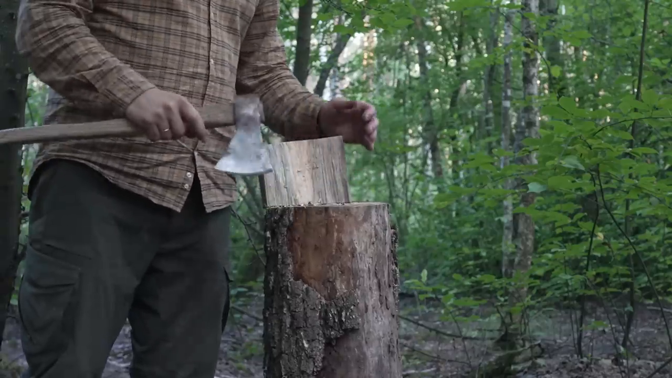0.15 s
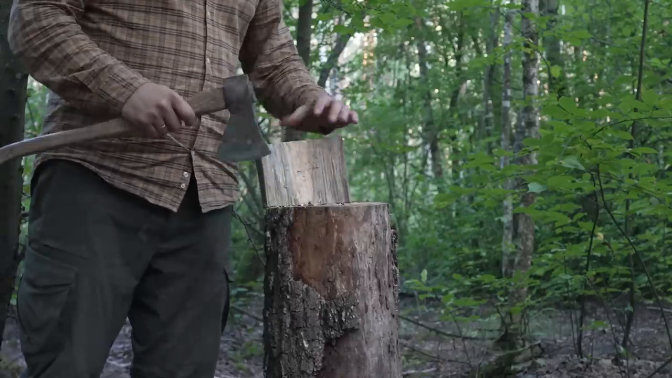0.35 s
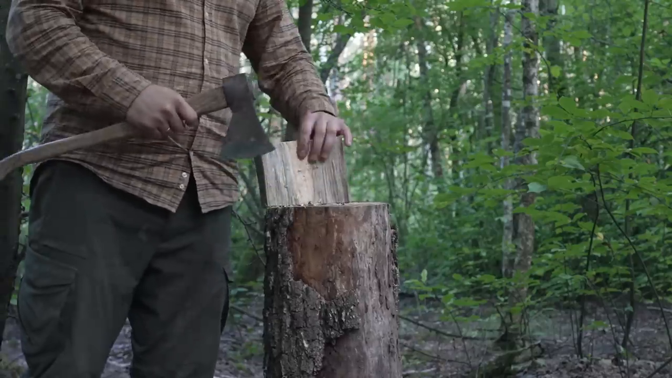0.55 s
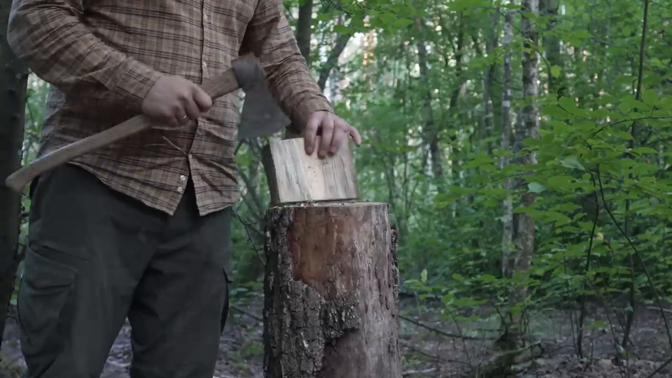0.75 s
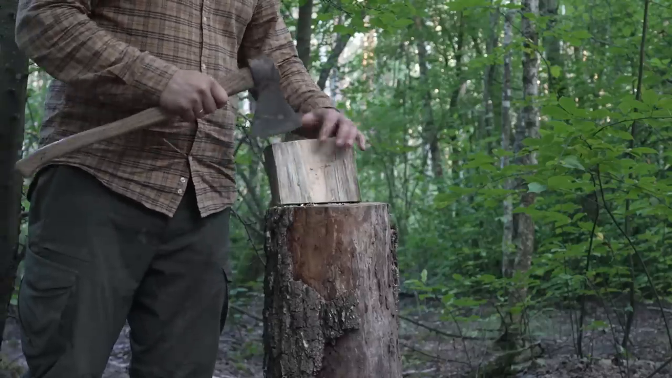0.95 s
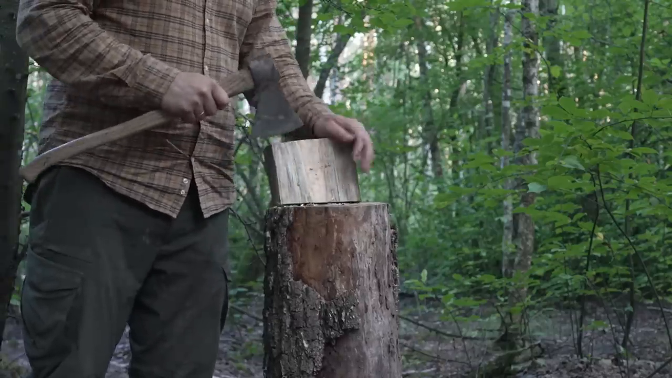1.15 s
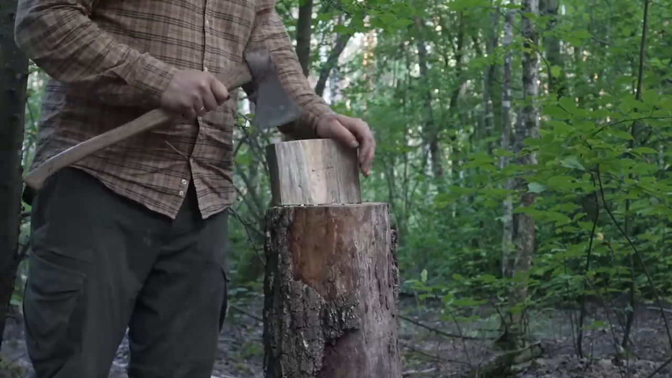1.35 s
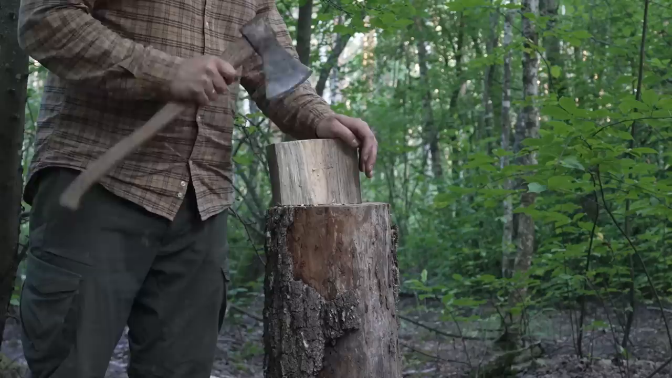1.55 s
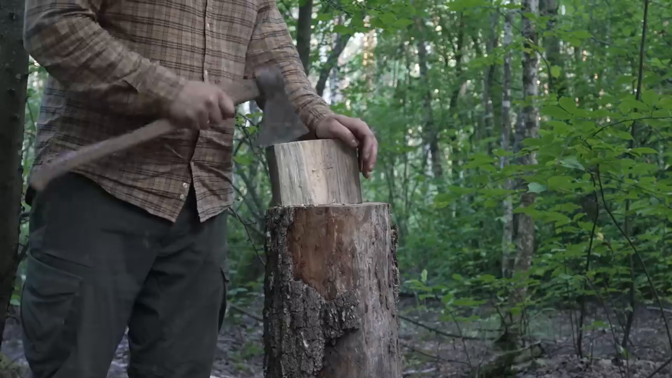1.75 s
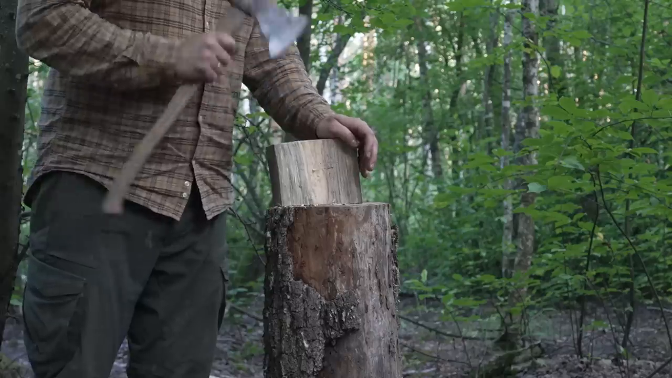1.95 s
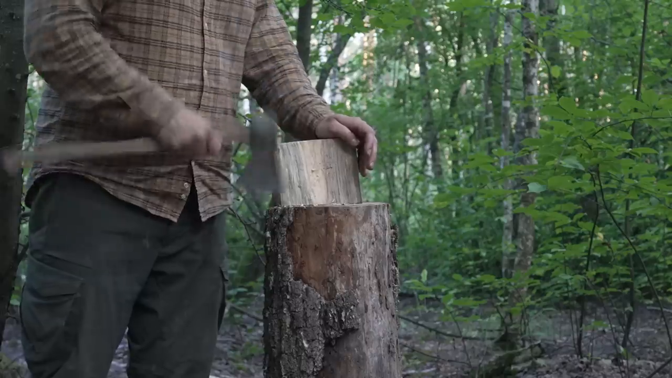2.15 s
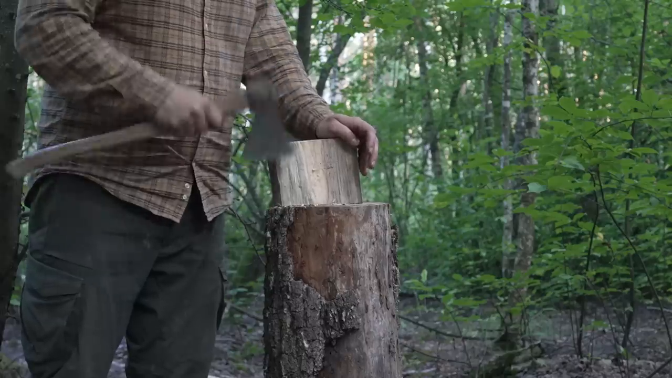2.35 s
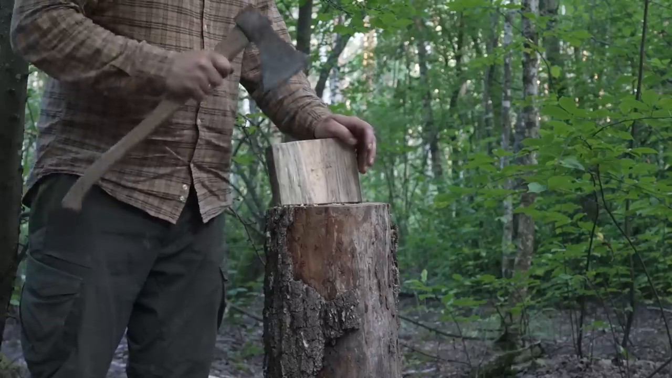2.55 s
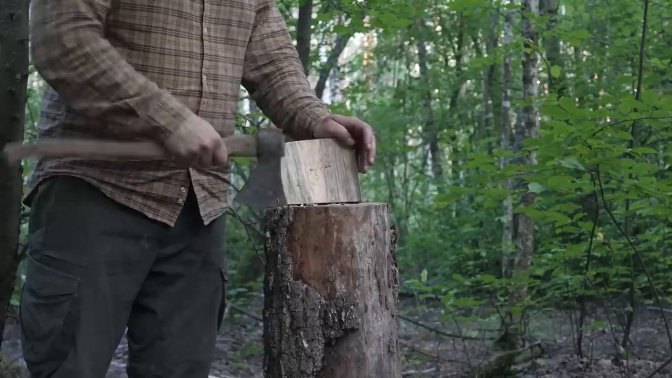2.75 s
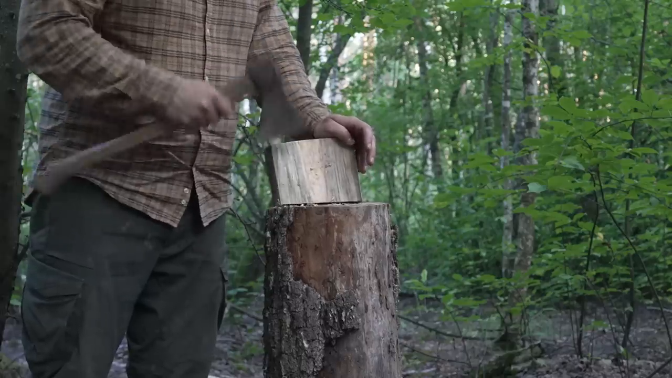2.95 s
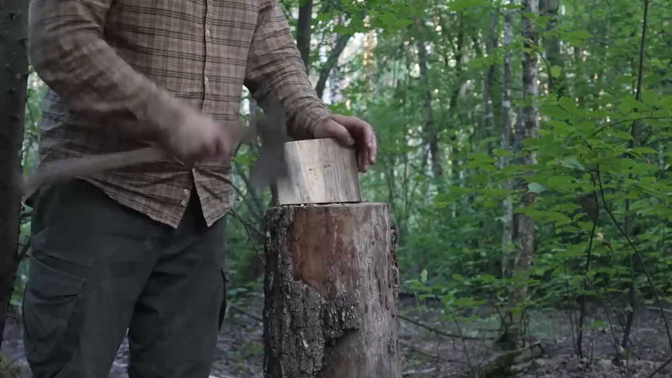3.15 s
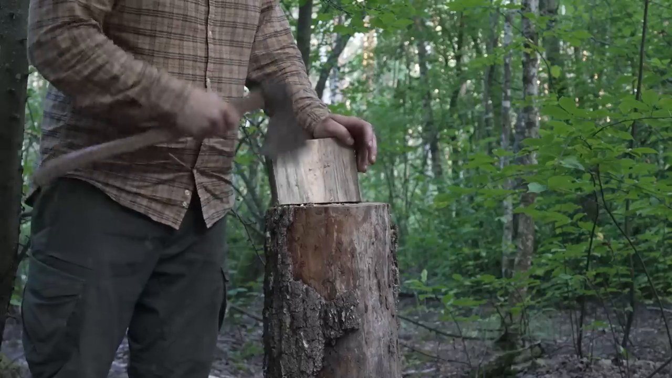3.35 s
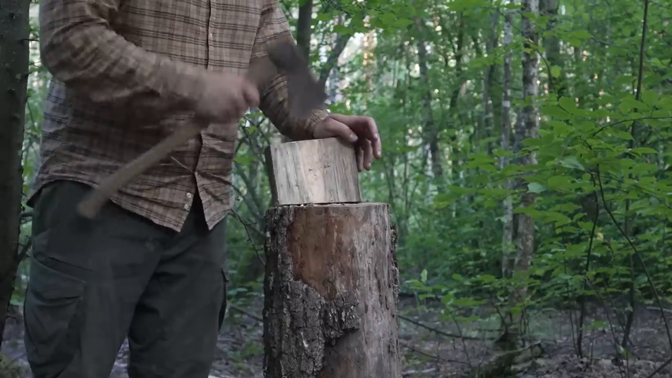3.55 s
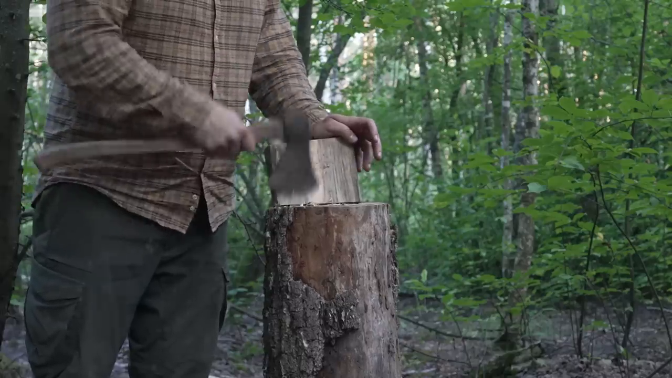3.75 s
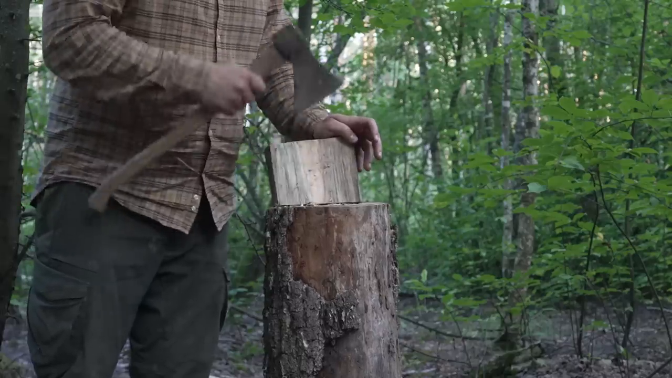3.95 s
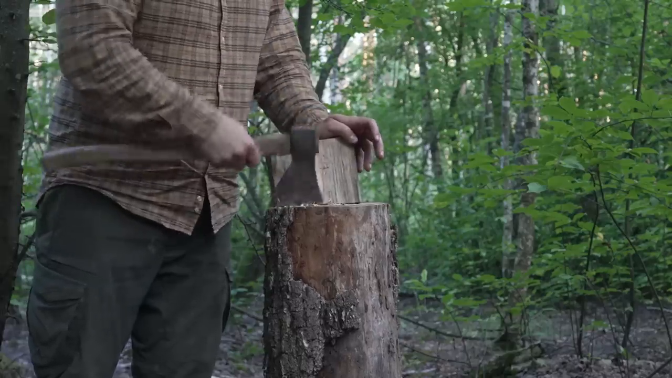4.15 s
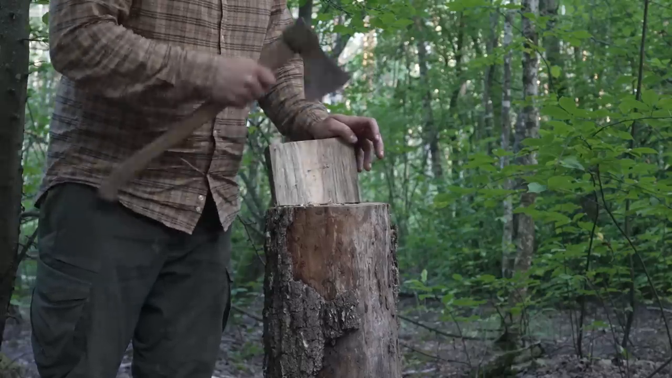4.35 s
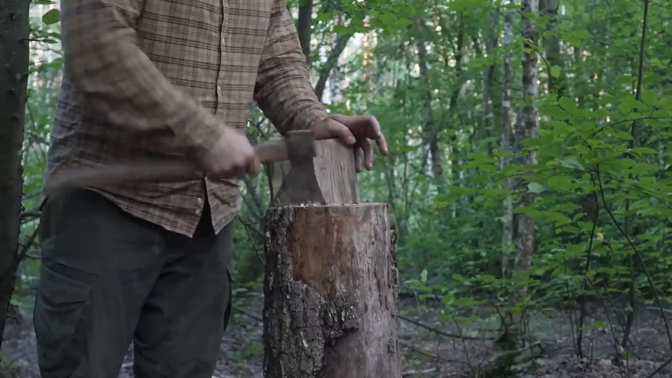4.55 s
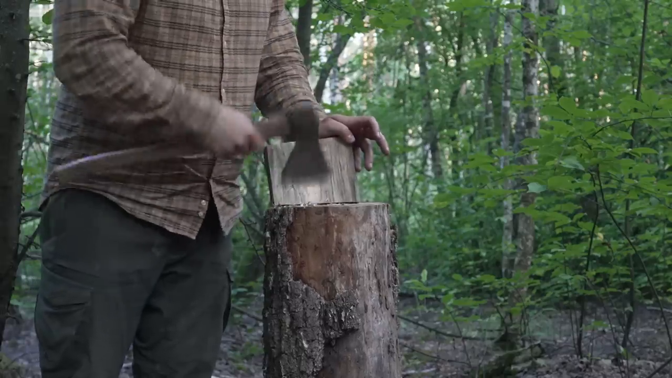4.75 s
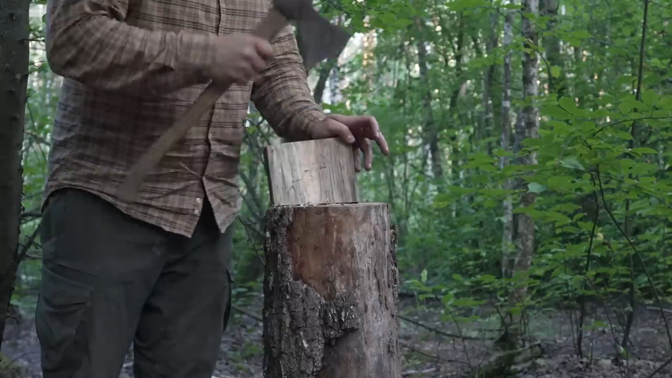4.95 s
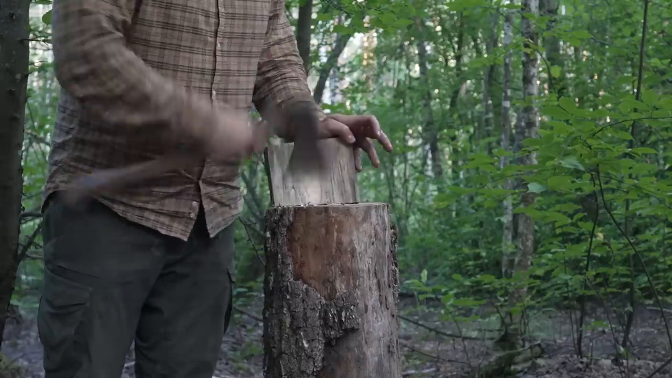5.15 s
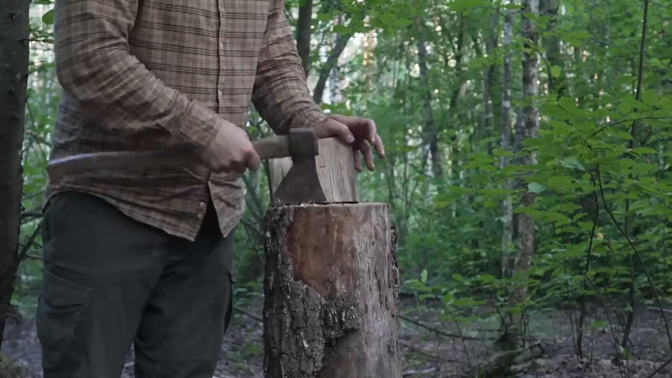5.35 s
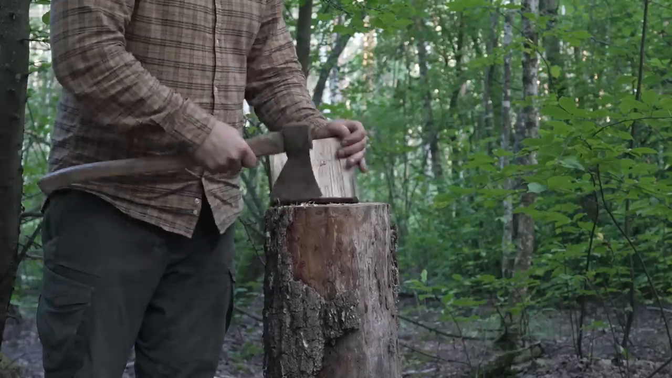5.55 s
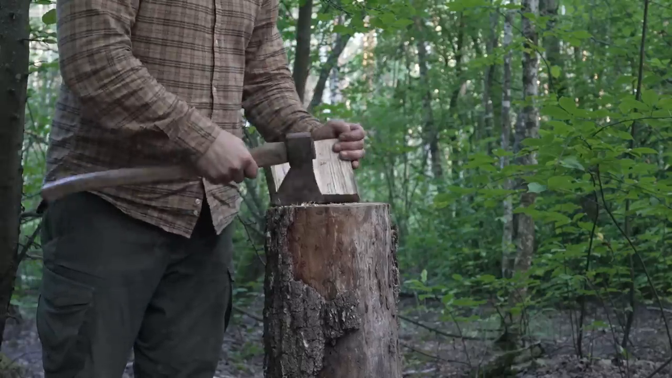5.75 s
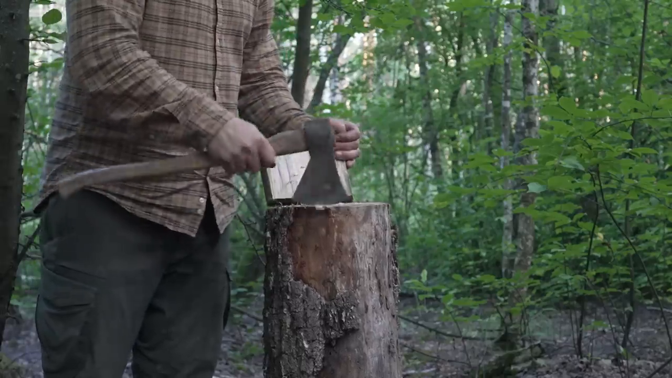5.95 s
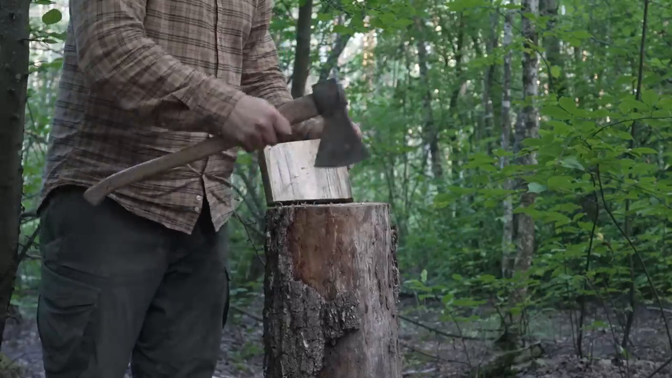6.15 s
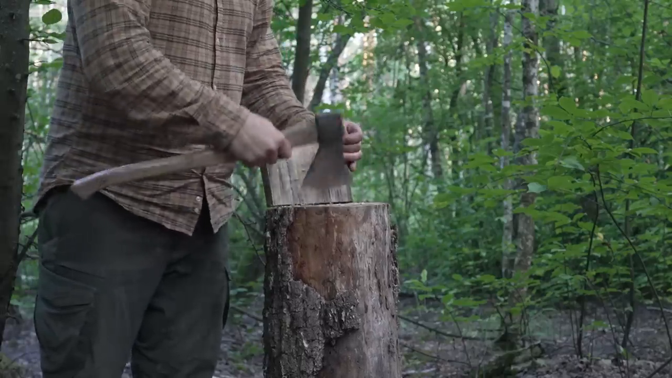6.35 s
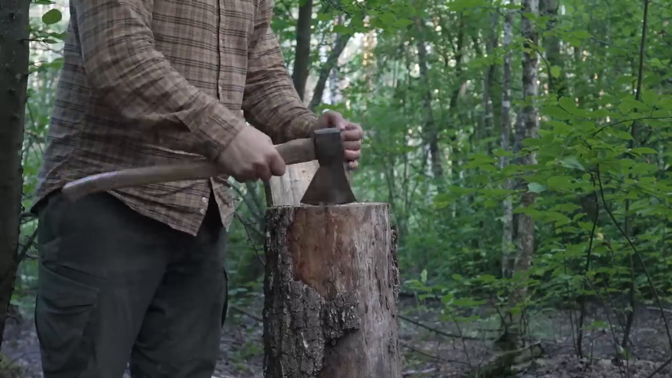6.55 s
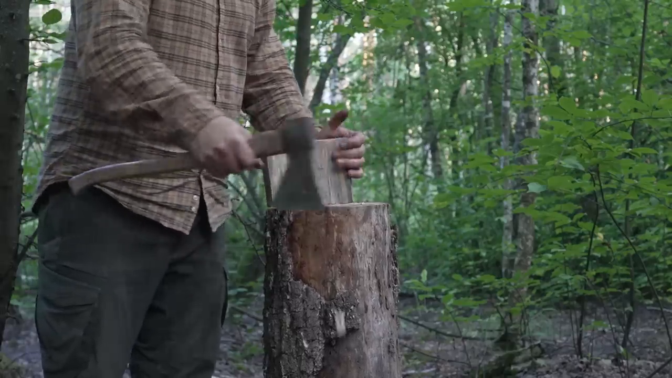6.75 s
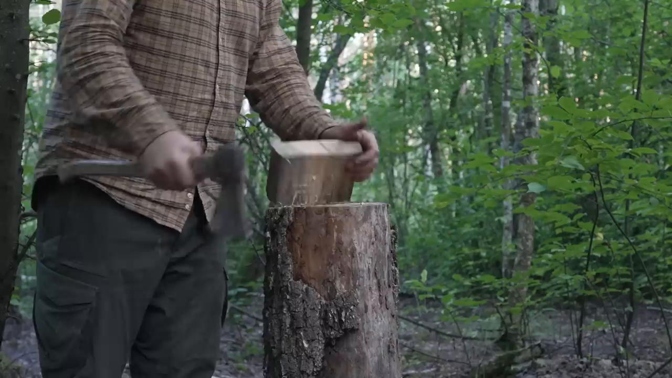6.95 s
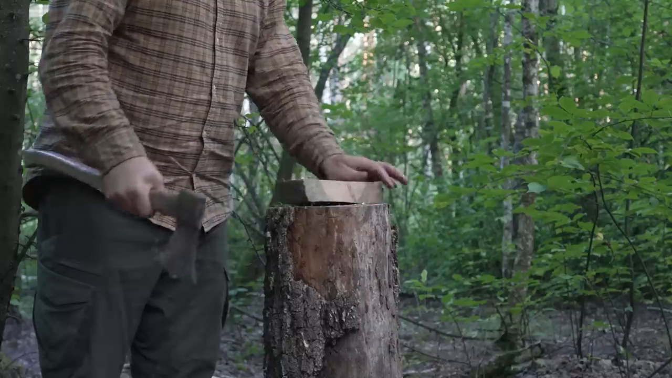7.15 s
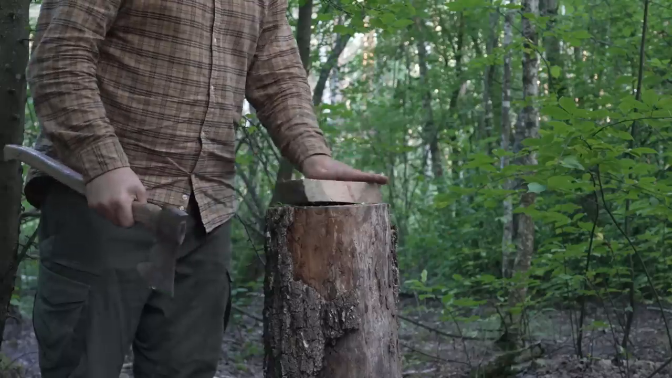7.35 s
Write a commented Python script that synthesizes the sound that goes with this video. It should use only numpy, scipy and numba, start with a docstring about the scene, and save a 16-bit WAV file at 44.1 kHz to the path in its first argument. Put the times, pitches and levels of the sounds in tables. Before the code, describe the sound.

Sharp hatchet blows split wood on a stump, then softer knocks and rustles follow over faint woodland hiss.

```python
"""Hatchet splitting wood

A hatchet takes thin pieces off a block on a stump in a wood. A chop is two impacts, the edge biting
and then meeting the stump, each exciting the modes of the wood; between them sliding friction tears
the fibres and sets the steel head ringing. Chips fall into dry leaves, trunks scatter a soft echo
and the ground thuds, over a faint murmur and hiss. The hardest blows overload."""
import sys
import numpy as np
from scipy import signal
from scipy.fft import rfft, irfft
from scipy.io import wavfile
from scipy.ndimage import uniform_filter1d
from numba import njit

SR = 44100
rng = np.random.default_rng(int(sys.argv[2]) if len(sys.argv) > 2 else 0)


def wav_out(sig):
    """Save sig, one row per channel (or a flat mono array), as 16-bit PCM at SR to the path in sys.argv[1]."""
    wavfile.write(sys.argv[1], SR, np.round(np.clip(np.atleast_2d(sig).T, -1, 1) * 32767).astype(np.int16))


N = 326340

# background noise: f/Hz, relative spectral level/dB
AIR_SPECTRUM = [(15, -31), (25, -1), (129, -8.5), (156, -1.5), (233, -14), (389, -11), (457, -12.5),
                (509, -12), (2120, -22.5), (2420, -24), (6050, -27.5), (6920, -27.5), (15500, -29)]
# the blade sliding on wood: start/s, end/s, tearing/dB, wood rubbed/dB, steel struck/dB,
# steel rubbed/dB, steel overtones/dB, muting of the steel at the end/dB (negative: a boost)
BLADE_SLIDES = [(0.0, 0.009, -53, -47, -43.5, -97, -16, -6), (1.745, 1.753, -41.5, -42, -70, -99, -3, 20),
                (2.207, 2.218, -37, -25.5, -40.5, -65, -6.5, -3.5),
                (2.2276, 2.272, -38, -35.5, -23.5, -63.5, -8.5, 32.5),
                (2.81, 2.848, -47, -29.5, -42, -49, -2.5, 28),
                (3.241, 3.276, -47.5, -31.5, -28.5, -68, -2.5, 31.5),
                (3.705, 3.733, -43, -27, -29, -57, -2.5, 28.5), (3.799, 3.835, -58, -64, -63, -87, 3, 4),
                (4.138, 4.167, -46.5, -24, -23.5, -61.5, -6, 25.5),
                (4.626, 4.65, -45, -15.5, -32, -58, -5.5, 31.5),
                (4.783, 4.815, -60, -72, -64, -90.5, 10, 7),
                (5.258, 5.274, -55, -17.5, -31.5, -42.5, -10, 33.5),
                (5.888, 5.943, -57.5, -56.5, -66, -82.5, 8.5, 6), (5.944, 6.019, -50, -53, -45, -70, 3, 2),
                (6.539, 6.573, -54.5, -49.5, -53, -72, -1, -9),
                (6.577, 6.626, -53, -49.5, -45, -59, 2.5, 6), (6.633, 6.661, -52, -48.5, -38, -64.5, 0, 9),
                (6.660, 6.689, -51, -46.5, -51, -63, 0, 6.5)]
# modes of the hatchet head: f/Hz, level/dB, free T60/s, share of the muting felt
STEEL_MODES = [(2589, -1.5, 0.062, .95), (2610, -4.5, 0.058, 1.1), (4350, -13, 0.5, 1.1),
               (4399, -1.5, 0.76, 0.68), (6220, -13.5, 0.078, 0.99), (6900, -15.5, 0.13, .9),
               (7800, -17, .15, .8), (10970, -18, 0.02, 0.796), (11630, -12.5, 0.12, .6),
               (12650, -17.5, .06, .8)]
# modes of block and stump: f/Hz, level/dB, T60/s
WOOD_MODES = [(142, 3.5, 0.1), (180.6, 4, 0.12), (269, -3.5, 0.026), (344, 3, 0.041), (428.5, 5, 0.037),
              (538.6, 5, 0.048), (618, 3.5, 0.032), (749, 5.5, 0.055), (775, 0.76, .03), (1135, 6.5, 0.029),
              (1503, 5, 0.02), (1663, 1.7, 0.024), (1907, 3, 0.019), (2380, -0.5, 0.0061),
              (3040, -6, 0.021)]
# leaves, bark and cloth: peak t/s, fall time/s, level/dB, centre f/Hz, bandwidth over centre
RUSTLE_SWELLS = [(0.03, 0.25, -60.5, 7923, 1.7), (0.275, 0.039, -54, 6500, 1.9),
                 (0.299, 0.03, -54, 1970, .35), (0.328, 0.011, -51, 5160, 2.1),
                 (0.389, 0.029, -50, 8000, 1.5), (0.464, 0.12, -59.5, 5705, 3.3),
                 (0.809, 0.064, -60, 4000, 1.9), (0.81, .04, -66, 2000, .45),
                 (3.112, 0.071, -50.5, 1870, 1.34), (3.115, 0.043, -56.5, 9000, 1.1),
                 (3.479, 0.077, -52, 4836, 1.2), (5.776, 0.074, -62, 1505, 1.1),
                 (5.779, 0.064, -64, 5220, 0.54), (6.76, 0.11, -63.5, 1390, 2.1),
                 (7.089, .07, -61.5, 1840, .3), (7.11, 0.1, -60.5, 3200, 0.89),
                 (7.157, 0.018, -44.5, 2470, 1.7), (7.2, 0.28, -61.5, 3500, 2.3),
                 (7.33, .09, -64, 1940, 0.41)]
# reverberation among the trees: f/Hz, level/dB, T60/s
ECHO_BANDS = [(153, -26, 0.38), (310, -29, 0.36), (574, -44, 1.7), (860, -40.5, 1.39),
              (1312.4, -31.5, 0.74), (2100, -31.5, 0.84), (3300, -26.5, 0.48), (5594, -26, 0.41),
              (9000, -28, 0.45), (13020, -34.5, 0.37)]
# breaking fibres, chips and twigs: t/s, body level/dB, treble level/dB
FIBRE_SNAPS = [(0.057, -47, -43.5), (0.096, -46, -45), (0.167, -50.5, -55), (0.263, -42, -33),
               (0.272, -40, -34), (0.289, -28, -27.5), (0.385, -34, -37.5), (0.4616, -44, -47),
               (0.527, -58, -47), (0.698, -57, -52), (0.785, -41.5, -39), (0.829, -34, -46),
               (0.895, -49, -52), (2.2085, -25, -12), (2.2222, -24.5, -16.5), (2.227, -24.5, -17),
               (2.253, -35.5, -23.5), (2.262, -14.5, -20), (2.7232, -42.5, -50), (3.460, -37.5, -44),
               (5.4563, -46.5, -59), (6.531, -42, -50), (7.151, -32, -43), (7.188, -38, -62),
               (7.220, -56.5, -46.5)]
# impacts on wood: t/s, level/dB, favoured f/Hz, low modes/dB, high modes/dB, T60 factor, crack/dB
WOOD_KNOCKS = [(0.318, -23, 256, -14.5, -13, 0.6, -23.5), (0.604, -44.5, 264, -8, -9, 0.51, -53),
               (0.673, -39.5, 374, -10, -5, 0.55, -44), (0.872, -17, 433, -33, -18.5, 0.52, -52.5),
               (1.747, -2.5, 549, -19.5, -8, 0.94, -25), (2.210, -5, 441, -25.5, -8, 0.8, -24),
               (2.251, -14, 337, -9.5, -1.5, 0.36, -21), (2.266, -9, 716, -11, 4, 0.83, -10),
               (2.700, -34, 347, -12.5, -8.5, 0.45, -39), (2.813, -7.5, 538, -31, -12.5, 0.93, -25),
               (2.844, -7.5, 439, -9.5, -1.5, 0.78, -13.5), (3.240, -4.5, 589, -19, -25, 0.58, -25.5),
               (3.267, -1, 342, -14.5, -14, 0.99, -20), (3.705, -1, 452, -28.5, -30, 0.65, -21),
               (3.733, -9, 331, -16.5, -13.5, 0.82, -30), (4.138, 2.5, 447, -30, -16, 0.49, -21.5),
               (4.163, -2, 331, -27.5, -15.5, 1, -25.5), (4.6216, 6, 697, -29.5, -17.5, 0.32, -21),
               (4.643, -3.5, 611, -14, -12.5, 0.95, -29.5), (5.256, 5.5, 807, -29, -23.5, 0.52, -16.5),
               (5.275, -4.5, 331, -25.5, -8.5, 1, -25.5), (5.704, -24, 336, -41, -24, 0.6401, -45),
               (5.956, -36, 336, -17, -6, 0.87, -54), (6.508, -28, 353, -19.5, -17, 0.88, -50),
               (6.683, -31.5, 380, -9, -2.5, 0.84, -30), (7.013, -47.5, 336, -7.5, -1, 0.83, -52),
               (7.175, -20, 522, -27, -9, 0.7, -36), (7.207, -24, 323, -16, -7.5, 0.66, -46),
               (7.244, -34.5, 334, -22, -27.5, 0.55, -60)]

CATCH_DB, CATCH_S, CHATTER_DB, CHATTER_S = 4, 0.004, 2.5, 0.013  # quick grit, slower chatter of the edge
GRIPPED_T60_S, BEDDED_S = 0.23, 0.05  # after a chop the edge stays in the stump for a moment
WEDGED_SHARP, WEDGED_WOBBLE = 0.012, 0.012  # squeezing raises and shakes the head's pitch by these shares
EARLY_DB, EARLY_T60_S, BLUR_HZ = 15, 0.12, 25
STEEL_ECHO_DB = -1  # the head radiates sideways, so the trees get their own share of it
SNAP_T60_S, SNAP_RISE_S, CRACK_T60_S, CRACK_RISE_S = 0.024, 0.0015, 0.014, 0.00021
TICKS_PER_S, TICK_DB = 2, -59  # stray ticks in the leaf litter
CONTACT_S, CONTACT_CYCLES, SOFTER_PER_DB = 0.00086, 0.36, 0.0626  # weaker blows stay in contact longer
THUD_HZ, THUD_DB, THUD_T60_S = 40.8, -47, 0.8
AIR_DB, FULL_SCALE, TOP_HZ = -62.5, 0.82, 16000


def undb(db):
    """Amplitude ratio of a level in decibels."""
    return 10 ** (np.asarray(db) / 20)


def fade(t, t60):
    """Exponential decay of 60 dB in t60 seconds."""
    return undb(-60 * t / t60)


def unit(x):
    """Normalisation to an rms of 1."""
    return x / np.sqrt(np.mean(x ** 2))


def at_peak(x, db):
    """Normalisation to a peak level of db."""
    return undb(db) * x / np.abs(x).max()


def band(x, hz, width_hz):
    """Butterworth band-pass with geometric centre hz."""
    top = width_hz / 2 + np.sqrt(hz ** 2 + width_hz ** 2 / 4)
    edges = [hz ** 2 / top, min(top, 0.48 * SR)]
    return signal.sosfilt(signal.butter(2, edges, "bandpass", fs=SR, output="sos"), x)


def add(out, s, sound):
    """Superposition of a sound starting at s seconds."""
    i = max(int(s * SR), 0)
    out[i:i + len(sound)] += sound[:N - i]


def grains(size, spread_db):
    """Heavy-tailed noise: rare large samples are heard as crackle."""
    return unit(rng.standard_normal(size) * undb(spread_db * rng.exponential(size=size)))


def smooth(x, span_s):
    """A moving average, which keeps the slow fluctuations."""
    return uniform_filter1d(x, int(span_s * SR))


@njit
def ring(force, turn, keep):
    """A driven, damped resonator whose frequency and loss may vary every sample."""
    y, z = np.empty(len(force)), 0j
    for i in range(len(force)):
        z = z * turn[i] * keep[i] + force[i]
        y[i] = z.imag
    return y


def air():
    """Spectrally shaped noise: distant woodland murmur and microphone hiss, the lows wandering in level."""
    hz = np.maximum(np.arange(N // 2 + 1) * SR / N, 1)
    knot_hz, knot_db = np.array(AIR_SPECTRUM).T
    spectrum = undb(np.interp(np.log(hz), np.log(knot_hz), knot_db))
    noise = irfft(rfft(rng.standard_normal(N)) * spectrum, N)
    wander = undb(3.4 * unit(smooth(smooth(rng.standard_normal(N), 0.1), 0.1)))
    return undb(AIR_DB) * unit(noise + (wander - 1) * band(noise, 130, 400))


def steel_ring(drive, grip, mute, bend):
    """Forced vibration of the head's modes, damped by the wood while it grips them."""
    out = 0
    for hz, db, t60, share in STEEL_MODES:
        damped_t60 = np.where(grip > 0, min(t60, GRIPPED_T60_S), t60)
        keep = fade(1 / SR, damped_t60) * undb(-share * mute)
        turn = np.exp(2j * np.pi * hz * bend / SR)
        group = int(hz > 3500) + int(hz > 5500)
        out = out + undb(db) * ring(drive[group] + 1e-18, turn, keep)
    return out


def slides():
    """Stick-slip friction hisses and drives wood and steel; returns the tearing and the steel's ring."""
    tear, shake, grip, mute, wedged = np.zeros((5, N))
    catch, chatter = (unit(smooth(rng.standard_normal(N), s)) for s in (CATCH_S, CHATTER_S))
    roughness = unit(undb(CATCH_DB * catch + CHATTER_DB * chatter))
    drive = np.zeros((3, N))  # force on the low pair of modes, the main pair and the overtones
    mute_samples = int(0.008 * SR)
    for start, end, tear_db, wood_db, struck_db, rubbed_db, high_db, mute_db in BLADE_SLIDES:
        span = end - start
        t = np.arange(int((span + 0.024) * SR)) / SR
        onset = np.minimum(1, t / (0.2 * span))
        release = fade(np.maximum(t - span, 0), t60=0.02)
        shape = onset * undb(-3.5 * t / span) * release  # the rubbing eases along the slide
        force = undb(rubbed_db) * shape * grains(len(t), 0.9) * roughness[int(start * SR):][:len(t)]
        force[0] = undb(struck_db)
        for group, group_db in zip(drive, (0.71 * high_db + 1.5, 0, high_db)):
            add(group, start, undb(group_db) * force)
        add(tear, start, undb(tear_db) * shape)
        add(shake, start, undb(wood_db) * shape)
        is_chop = mute_db > 15
        add(grip, start, np.ones(int((span + BEDDED_S * is_chop) * SR)))
        add(wedged, start, np.full(int(span * SR), float(is_chop)))
        add(mute, end - 0.001, np.full(mute_samples, mute_db / mute_samples))
    bend = 1 + wedged * (WEDGED_SHARP + WEDGED_WOBBLE * catch)
    hiss = unit(band(grains(N, 1.8), 6500, 13000)) * roughness
    rub = grains(N, 3) * np.sqrt(roughness)
    wood = unit(sum(undb(db - 5 * np.log2(hz / 550) ** 2) * band(rub, hz, 4 / t60)
                    for hz, db, t60 in WOOD_MODES))
    return tear * hiss + shake * wood, steel_ring(drive, grip, mute, bend)


def rustles():
    """Many tiny contacts in leaves, bark and cloth sum to swells of band-limited crackle."""
    out = np.zeros(N)
    for peak, fall, db, hz, width in RUSTLE_SWELLS:
        rise = fall / 2
        t = np.arange(-min(rise, peak), 3 * fall, 1 / SR)
        rising = np.cos(t / rise * np.pi / 2) ** 2
        falling = np.exp(-1.5 * (np.abs(t) / fall) ** 0.79)
        crackle = unit(band(grains(len(t), 1.8), hz, width * hz))
        add(out, peak + t[0], undb(db) * np.where(t < 0, rising, falling) * crackle)
    return out


def tree_echo(x):
    """Diffuse scattering: a strong, brief return from nearby trunks and undergrowth, a long one from afar."""
    t = np.arange(int(1.2 * SR)) / SR
    early = undb(EARLY_DB) * fade(t, EARLY_T60_S)
    shape = undb(-26.5) * (1 - np.exp(-t / 0.0025)) * (1 + early)
    # moving leaves and air shift the sound between two sets of paths, which blurs pure tones
    drift = np.cumsum(rng.standard_normal(N)) * np.sqrt(2 * np.pi * BLUR_HZ / SR)
    out = 0
    for weight in (np.cos(drift), np.sin(drift)):
        tail = sum(undb(db) * fade(t, t60) * band(rng.standard_normal(len(t)), hz, 0.46 * hz)
                   for hz, db, t60 in ECHO_BANDS)
        out = out + weight * signal.fftconvolve(x, tail * shape)[:N]
    return out


def snaps():
    """Brittle fracture radiates brief noise bursts: snaps, the crack of each knock, and stray ticks."""
    out, t = np.zeros(N), np.arange(int(0.06 * SR)) / SR
    cracks = [(s, db, db - 7) for s, *_, db in WOOD_KNOCKS]
    stray = rng.random((int(TICKS_PER_S * N / SR), 3))
    ticks = [(when * N / SR, TICK_DB - 6 * body, TICK_DB - 6 * treble) for when, body, treble in stray]
    kinds = (FIBRE_SNAPS, SNAP_T60_S, SNAP_RISE_S), (cracks + ticks, CRACK_T60_S, CRACK_RISE_S)
    for events, t60, rise in kinds:
        for s, body_db, treble_db in events:
            burst = grains(len(t), 2.8) * fade(t, t60) * (1 - np.exp(-t / rise))
            woody = at_peak(band(burst, 745, 745), body_db - 10.5)
            body = at_peak(band(band(burst, 2900, 3500), 3700, 5500), body_db)
            treble = at_peak(band(burst, 8400, 8400), treble_db)
            add(out, s, woody + body + treble)
    return out


def knocks():
    """Impact excitation: each blow rings the wood's modes, the middle ones most near its favoured pitch."""
    out, t = np.zeros(N), np.arange(int(0.25 * SR)) / SR
    hz, mode_db, t60 = np.array(WOOD_MODES).T[:, :, None]
    for s, db, centre_hz, low_db, high_db, t60_factor, _ in WOOD_KNOCKS:
        scatter, detune = rng.standard_normal((2, len(WOOD_MODES), 1))
        octaves = np.log2(hz / centre_hz)
        steepness = np.where(octaves > 0, 20 - 0.52 * db, 9)  # soft blows barely excite higher modes
        middle_db = -np.minimum(steepness * octaves ** 2, 13 - 0.34 * db)
        colour_db = np.where(hz < 220, low_db, np.where(hz > 1300, high_db, middle_db))
        envelopes = undb(mode_db + colour_db + 2 * scatter) * fade(t, t60 * t60_factor)
        modes = envelopes * np.sin(2 * np.pi * hz * (1 + 0.037 * detune) * t)
        contact_s = min(CONTACT_S, CONTACT_CYCLES / centre_hz) * (1 - SOFTER_PER_DB * db)
        # the push builds over the contact time; a hard one forces the first swings beyond the free ring
        push = (1 - np.exp(-t / contact_s)) ** 2 * (1 + 4 * undb(db) * np.exp(-t / 0.0024))
        add(out, s, at_peak(-modes.sum(axis=0) * push, db))
    # the knocks carry no deep bass below about 110 Hz
    return signal.sosfilt(signal.butter(2, 110, "highpass", fs=SR, output="sos"), out)


def ground_thud():
    """Structure-borne sound: the stump passes each blow into soft ground, which rumbles on."""
    blows, t = np.zeros(N), np.arange(SR) / SR
    for s, db, *_ in WOOD_KNOCKS:
        add(blows, s, undb([0.75 * db]))  # the ground answers soft blows more than in proportion
    response = fade(t, THUD_T60_S) * (1 - np.exp(-t / 0.011))
    rumble = unit(band(band(rng.standard_normal(N), THUD_HZ, 39), THUD_HZ, 39))
    return undb(THUD_DB) * rumble * signal.fftconvolve(blows, response)[:N]


def scene():
    """Superposition of direct sound, echo, ground and air in one channel."""
    wood = knocks()
    tearing, steel = slides()
    near = wood + snaps() + tearing + rustles()
    echo = tree_echo(near + undb(STEEL_ECHO_DB) * steel)
    return (near + steel + echo + ground_thud() + air())[None]


def record(dry):
    """Hard limiting flattens the highest peaks; a steep low-pass bounds the bandwidth."""
    lowpass = signal.ellip(10, 0.2, 70, TOP_HZ, fs=SR, output="sos")
    return signal.sosfilt(lowpass, np.clip(dry, -FULL_SCALE, FULL_SCALE))


dry = scene()
out = record(dry)
wav_out(out)
```